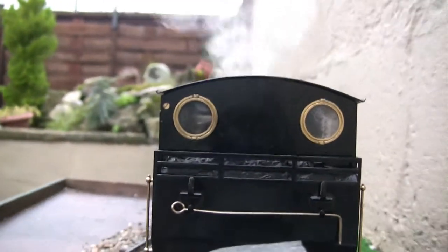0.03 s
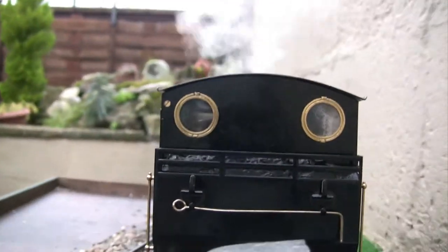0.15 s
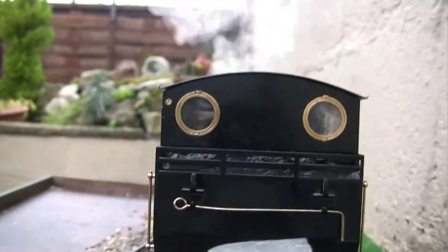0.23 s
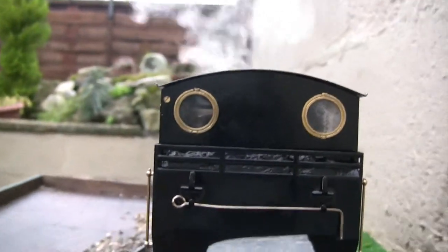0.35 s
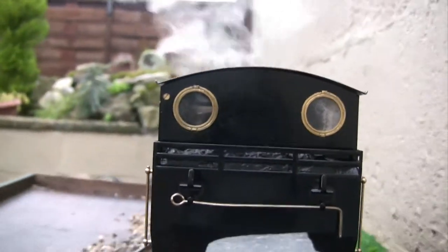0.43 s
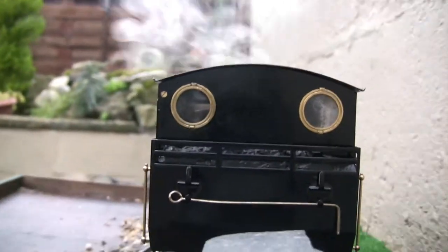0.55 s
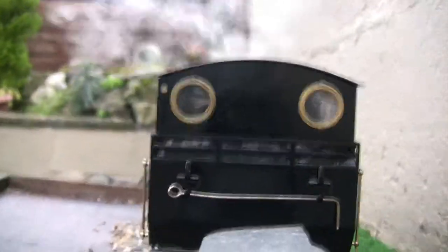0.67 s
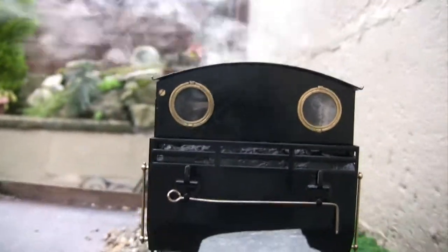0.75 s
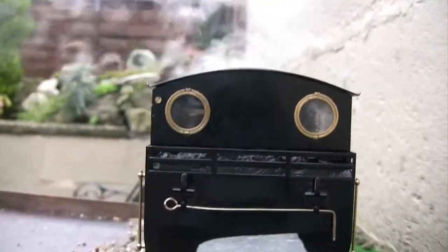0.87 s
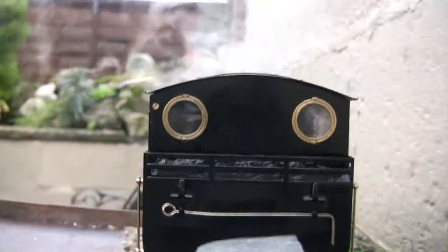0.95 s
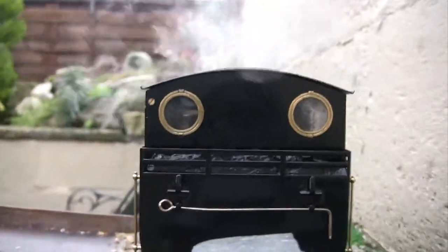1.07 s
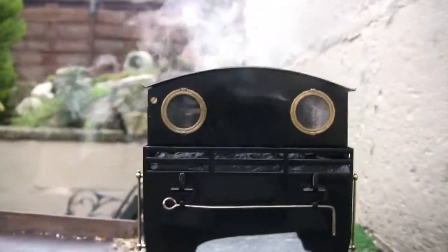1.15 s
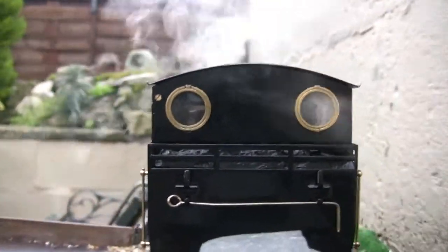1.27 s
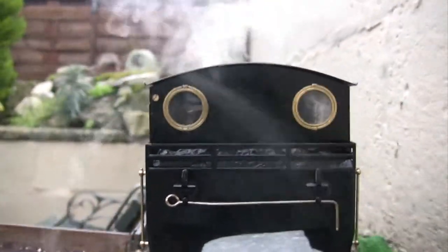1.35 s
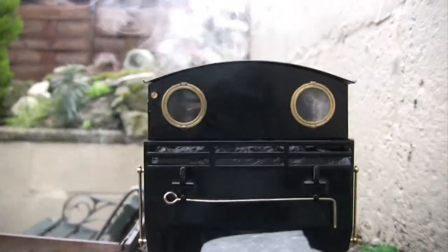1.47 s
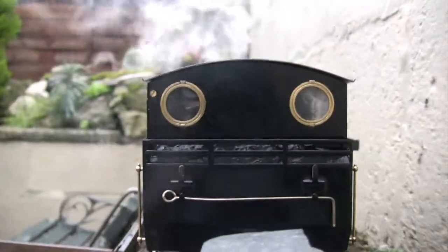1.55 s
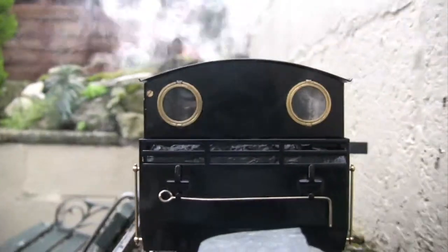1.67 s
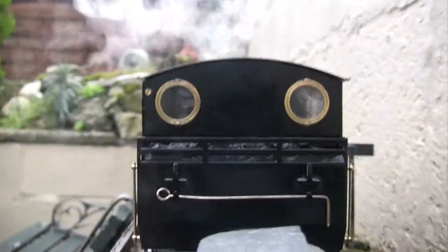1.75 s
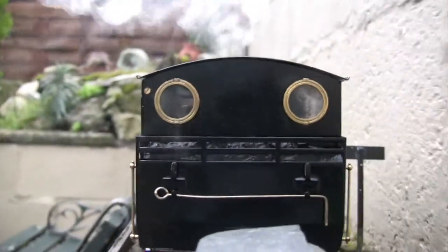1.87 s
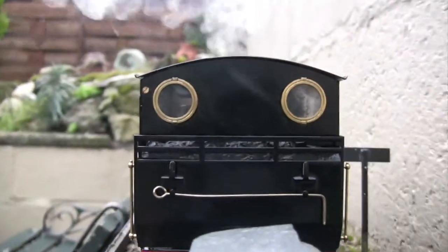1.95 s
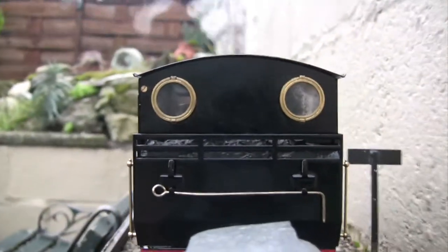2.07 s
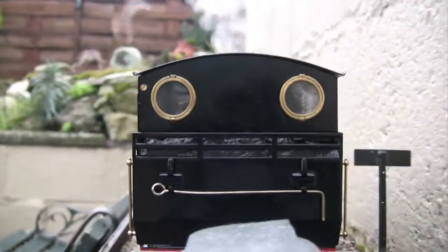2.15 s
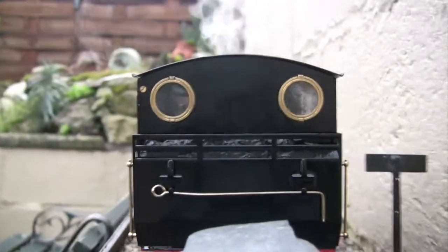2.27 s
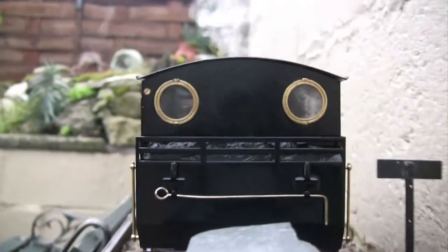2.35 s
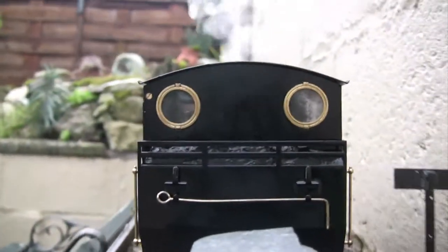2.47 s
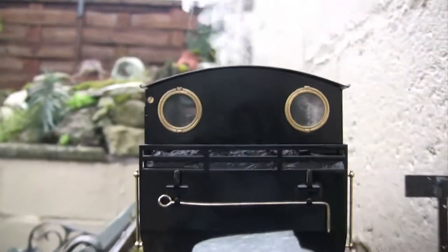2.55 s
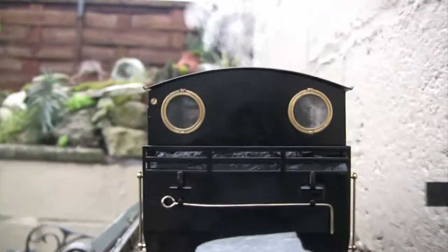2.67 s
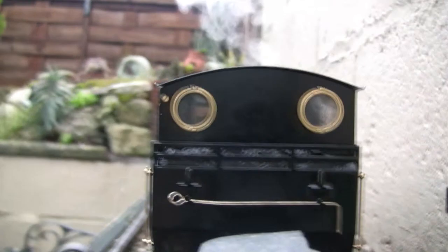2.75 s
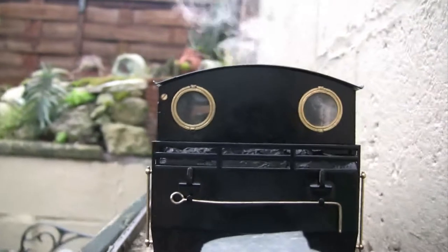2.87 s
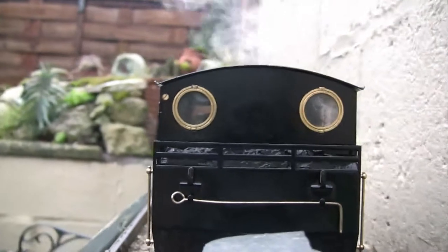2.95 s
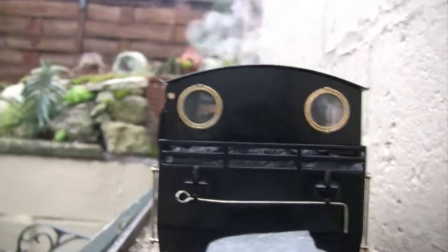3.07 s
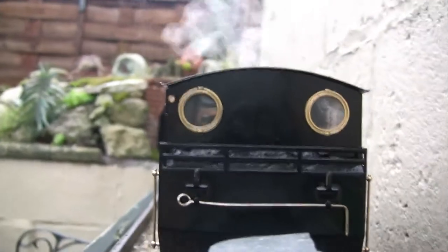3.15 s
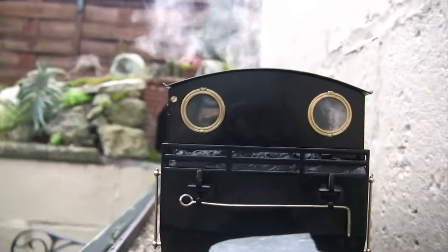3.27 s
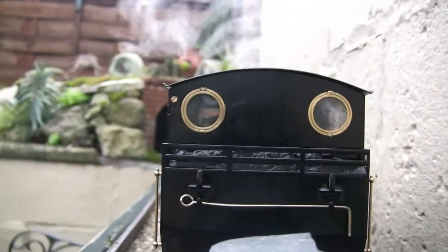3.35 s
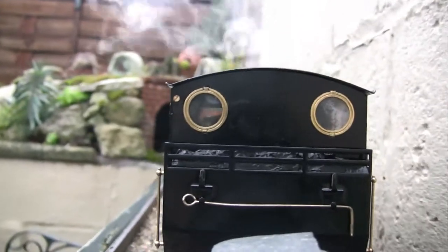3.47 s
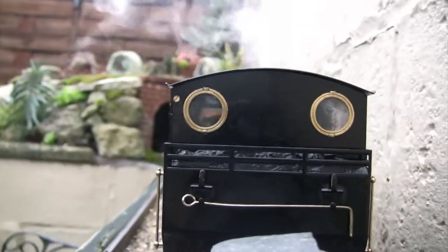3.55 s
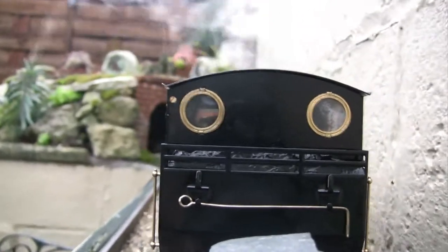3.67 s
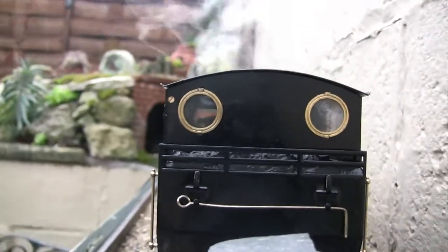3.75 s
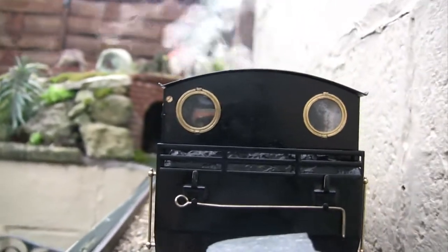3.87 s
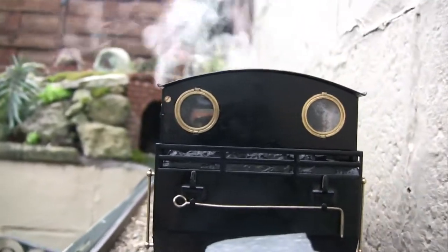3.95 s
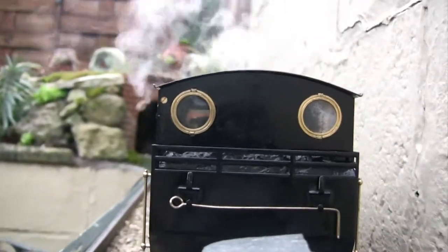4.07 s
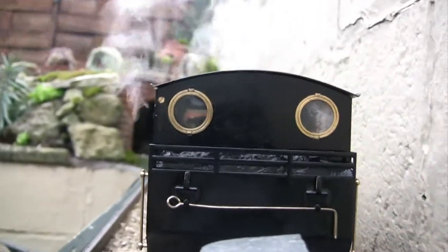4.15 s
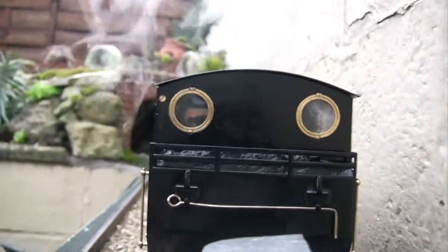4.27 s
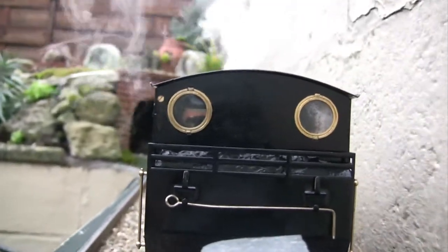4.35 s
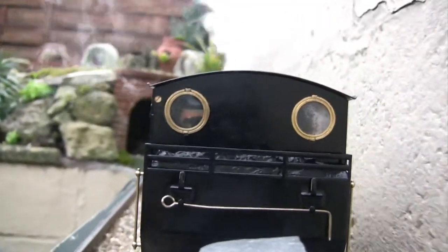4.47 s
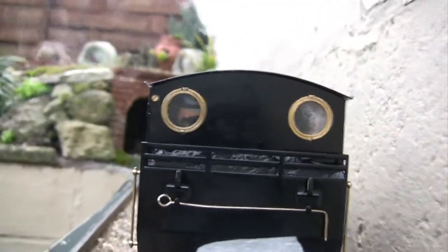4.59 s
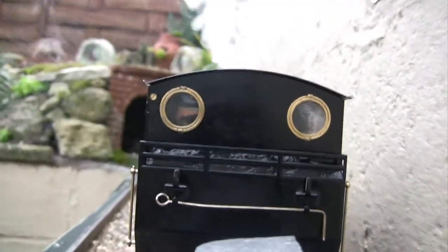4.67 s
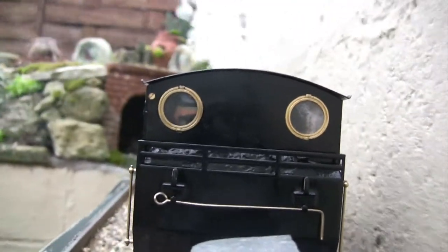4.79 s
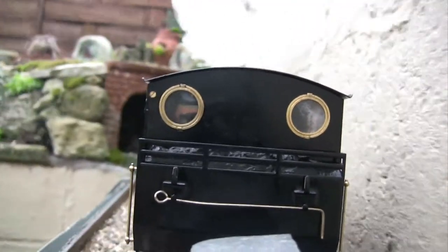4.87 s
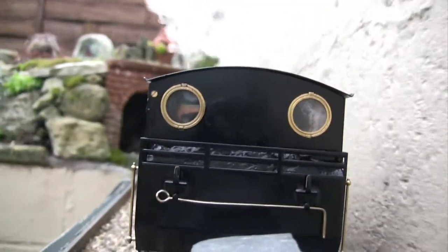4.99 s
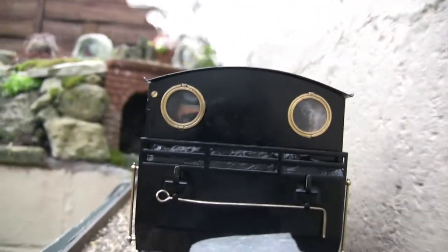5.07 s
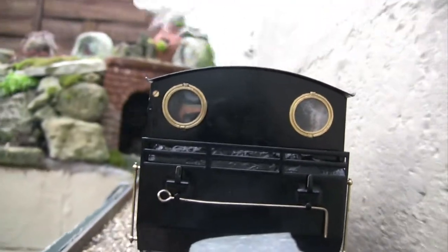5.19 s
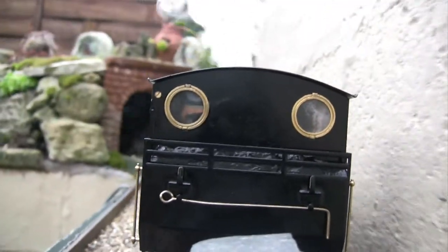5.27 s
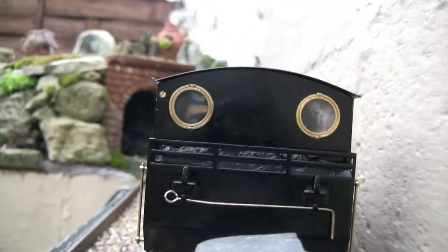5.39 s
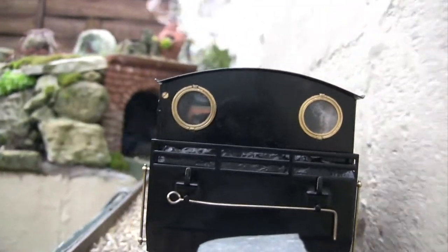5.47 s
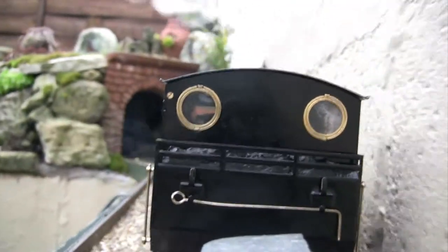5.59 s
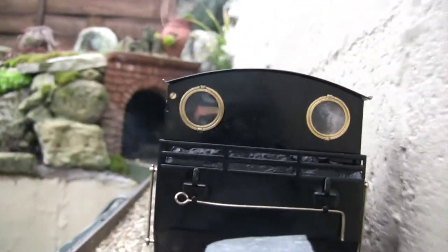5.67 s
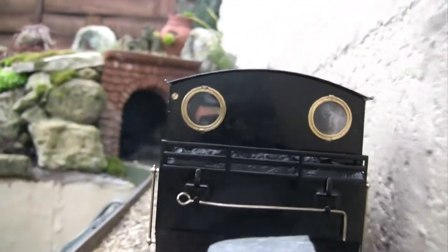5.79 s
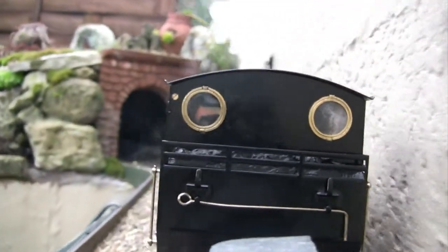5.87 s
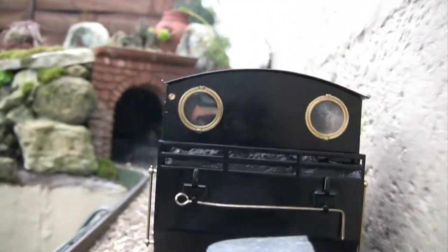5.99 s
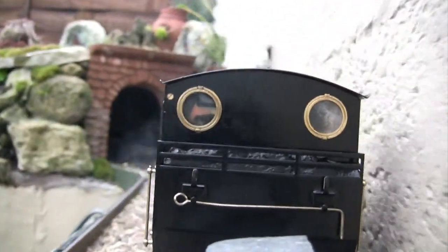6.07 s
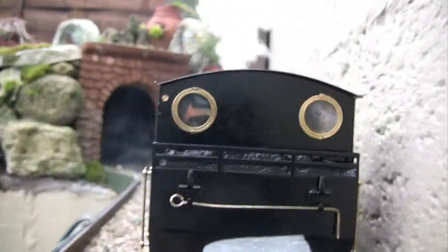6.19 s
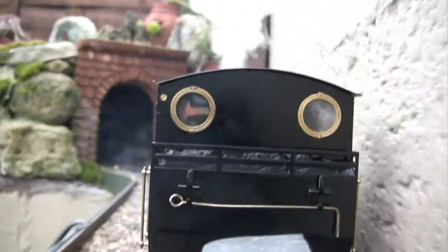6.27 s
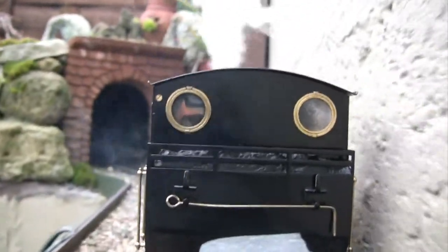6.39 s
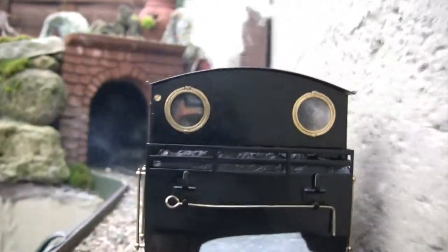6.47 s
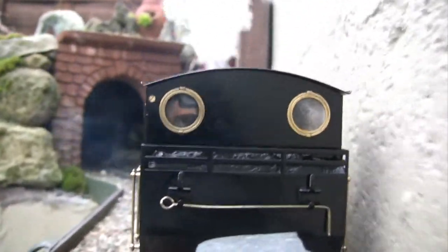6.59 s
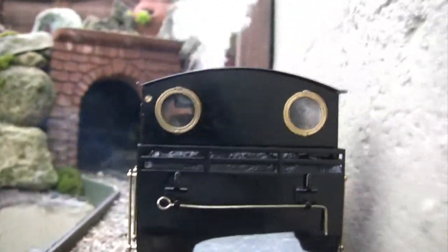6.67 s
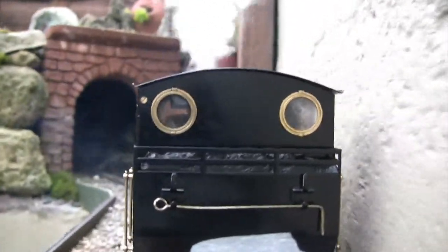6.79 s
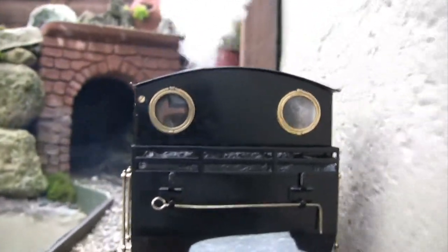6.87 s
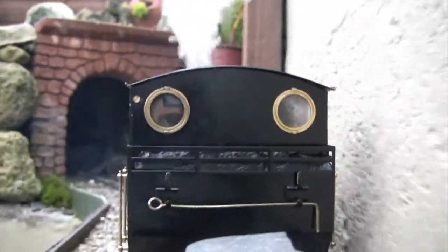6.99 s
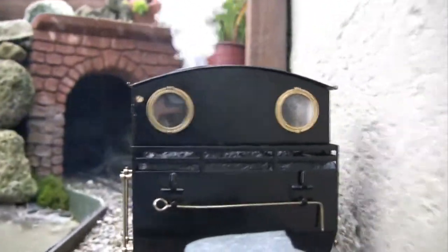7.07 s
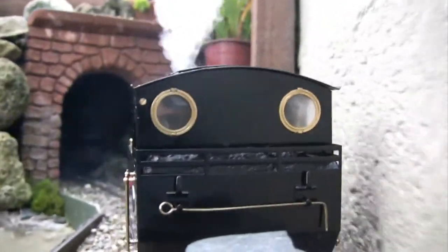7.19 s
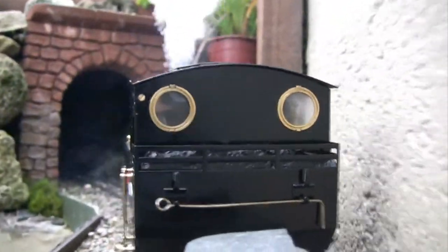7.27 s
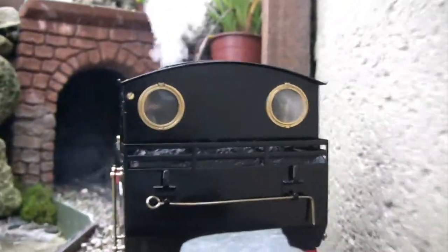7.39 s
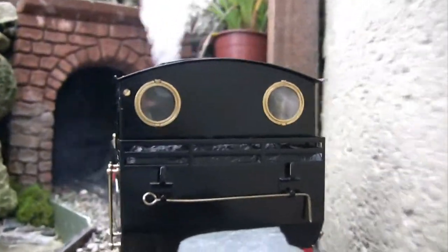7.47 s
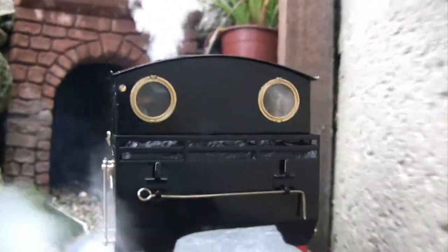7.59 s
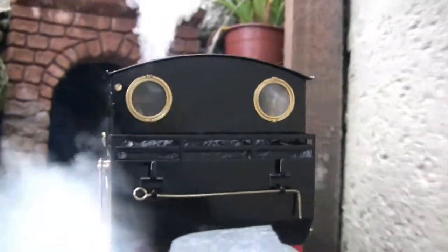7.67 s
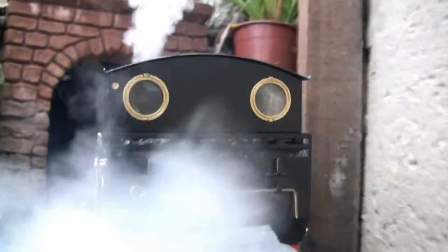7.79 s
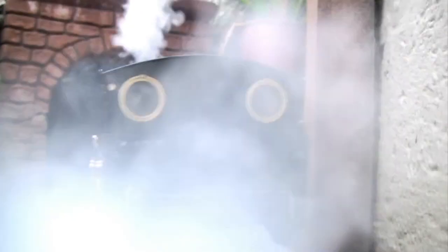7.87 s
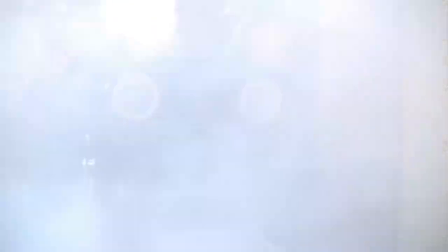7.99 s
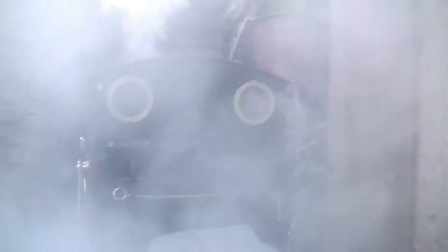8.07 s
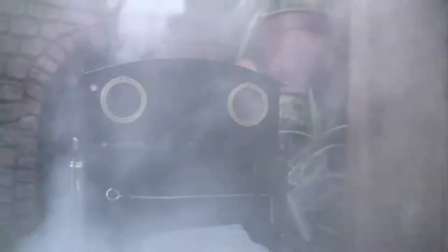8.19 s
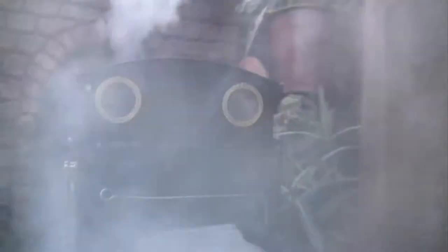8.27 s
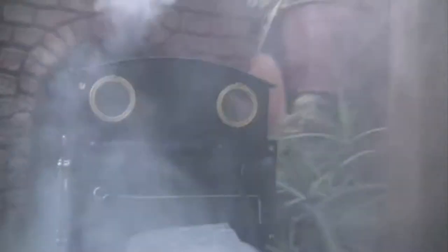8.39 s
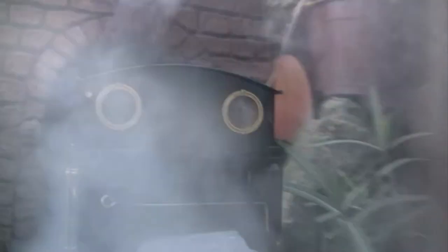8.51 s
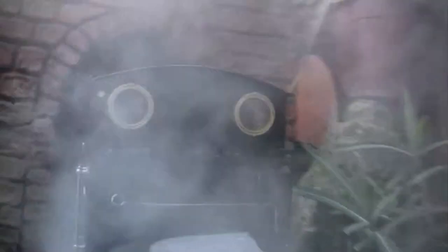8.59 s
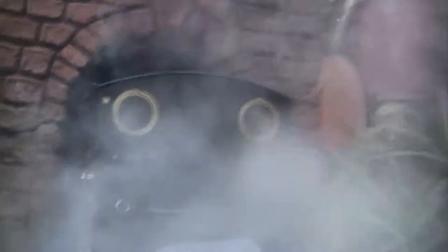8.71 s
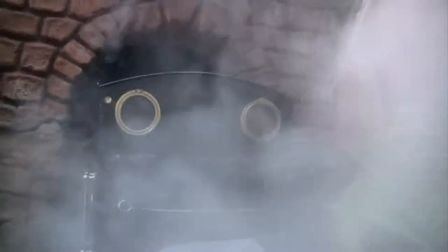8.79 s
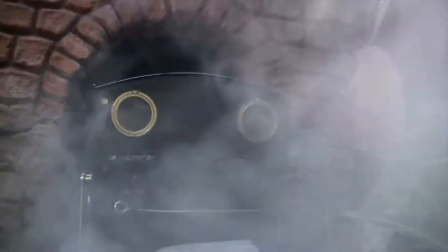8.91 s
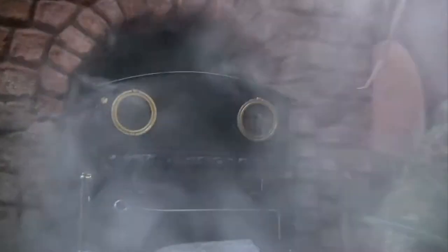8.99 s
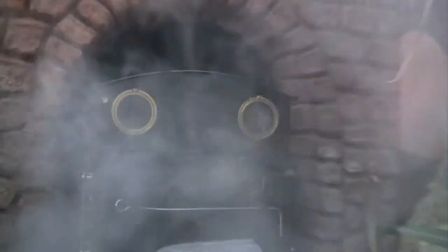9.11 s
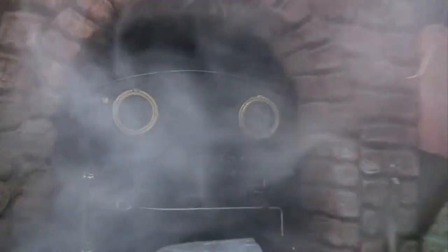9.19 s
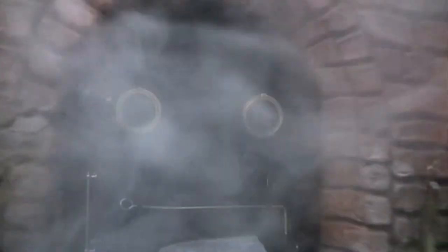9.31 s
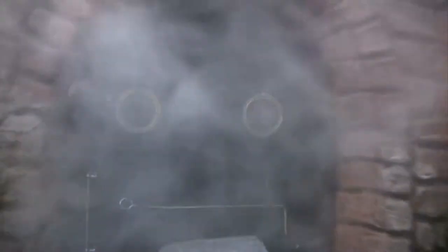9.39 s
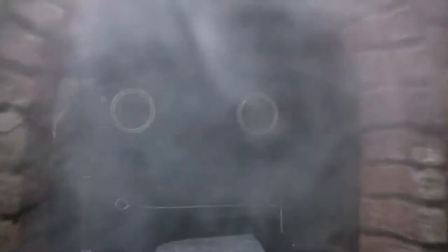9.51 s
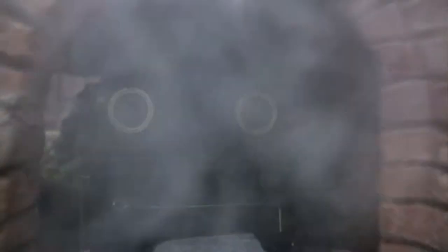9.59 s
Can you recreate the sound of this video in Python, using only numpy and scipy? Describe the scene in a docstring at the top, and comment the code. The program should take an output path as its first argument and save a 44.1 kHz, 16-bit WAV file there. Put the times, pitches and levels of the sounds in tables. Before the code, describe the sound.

A small live-steam engine chuffs and hisses along a garden track, then its shrill whistle blasts, distorting, before racing chuffs echo in a brick tunnel.

```python
"""Garden railway: a small live-steam locomotive, heard from just behind as it nears a tunnel.
Shaped noise gives the rolling rumble, the hiss and the chuffs, which slow on a curve and then pick up;
resonators and noise bursts give the rail joints and clinks. Near the tunnel the beats race in a cloud
of steam, a whistle of sine partials and jet noise overloads both microphones, and delayed copies
form the echoes of the wall and the brickwork."""
import sys
import numpy as np
from scipy import signal
from scipy.fft import rfft, irfft, next_fast_len
from scipy.io import wavfile

SR = 44100
rng = np.random.default_rng(int(sys.argv[2]) if len(sys.argv) > 2 else 0)


def dump(signal):
    """Clip the signal to [-1, 1] and save it as 16-bit WAV at the path in sys.argv[1]."""
    limited = np.clip(np.atleast_2d(signal).T, -1, 1)
    pcm = np.round(limited * 32767).astype(np.int16)
    wavfile.write(sys.argv[1], SR, pcm)


N = 425565
TIME = np.arange(N) / SR
CUTOFF_HZ = 15700

# Levels are those of each source before echoes and the microphone limit.
# regulator: t/s, port opening time constant/s, beat tail/s, share of full exhaust (0-1), share of wet steam (0-1)
REGULATOR = [(0, 0.001, 0.029, 0.18, 0.01), (2.3, 0.001, 0.021, 0, 0), (3.0, 0.002, 0.015, 0.47, 0),
             (4.2, 0.0037, 0.036, 0.94, 0.01), (5.0, 0.0029, 0.03, 1, 0.02),
             (7.15, 0.0035, 0.025, 0.98, 0.08), (7.45, 0.0056, 0.058, 0.35, 0.26),
             (8.75, 0.0023, 0.023, 0.8, 0.97), (9.65, 0.0022, 0.024, 1, 1)]
# driving wheels, racing as they slip near the tunnel: t/s, exhaust beats/(1/s)
SPEED = [(0.0, 13.23), (1.044, 13.45), (1.789, 11.94), (2.237, 10.19), (3.325, 7.75), (3.982, 7.73),
         (4.54, 13.25), (4.849, 15.08), (5.427, 14.05), (5.849, 16.4), (6.357, 16.32), (6.641, 17.66),
         (7.198, 16.46), (7.27, 23.14), (9.048, 31.61), (9.093, 28.82), (9.65, 31.47)]
# uneven valve setting, two cylinders giving four beats a turn: lateness of each beat/beats
VALVE_LATE = [.158, .072, .113, .153]
# strength of each of the four beats: level/dB
VALVE_DB = [0.3, 0.13, -0.3, -0.5]
# steam pressure behind the beats: t/s, level/dB
EFFORT = [(0, -30.5), (.8, -27), (1.8, -26.5), (2.35, -28), (2.75, -25.8), (3.05, -21), (3.3, -25.5),
          (3.72, -24.5), (4.1, -19.5), (4.6, -19), (4.8, -16.5), (7.1, -17), (7.45, -18.5), (8.9, -15),
          (9.05, -17.5), (9.65, -16)]
# hiss from the boiler: t/s, level/dB
HISS = [(0, -37.5), (1.3, -39.5), (2.5, -38), (3.7, -38.5), (4.2, -35.5), (5, -31), (9.65, -40)]
# steam escaping from the cylinders: t/s, level/dB
LEAK = [(0, -50), (7.15, -61), (7.3, -50), (7.45, -23.5), (7.6, -25), (8.7, -25), (9.0, -27), (9.65, -28.5)]
# rolling: t/s, deep rumble level/dB, wagon body level/dB, wheel and rail level/dB
ROLLING = [(0, -40.5, -37.5, -31), (.6, -44.5, -38.5, -30.5), (2.2, -47, -40, -30),
           (2.8, -48.5, -41.5, -30.5), (3.6, -54.5, -44.5, -30.5), (4.5, -51.5, -39.5, -29.5),
           (6.3, -47, -36, -27), (7.3, -49, -35, -26), (8.75, -55, -44, -34), (9.65, -58, -43, -32.5)]
# wheels over rail joints: t/s, peak level/dB, knock f/Hz
JOINTS = [(.775, -20, 89), (1.048, -29, 80), (1.476, -11.5, 640), (1.606, -22.5, 90), (1.831, -10.5, 710),
          (1.846, -12.5, 420), (2.29, -20, 130), (2.46, -20, 570), (4.742, -19, 168), (5.647, -8, 374),
          (5.91, -15.5, 169), (6.26, -17.5, 182), (6.941, -19, 230), (7.04, -15.5, 174), (7.297, 1, 750),
          (7.338, -17, 218), (9.378, -7.5, 600), (9.398, -9.5, 567)]
# clinks of the couplings, before a common trim: t/s, relative level/dB
CLINKS = [(0.194, -27), (.772, -26), (1.04, -23), (2.298, -26), (4.728, -27), (6.491, -17.5)]
# whistle pitch once settled: t/s, f/Hz
WHISTLE_PITCH = [(7.62, 1642), (7.68, 1637), (7.77, 1678), (7.81, 1656), (7.89, 1675), (8.02, 1661),
                 (8.2, 1688), (8.37, 1717), (8.44, 1699), (8.51, 1711), (8.59, 1673), (8.655, 1713)]
# steam through the whistle, first sputtering, then clearing:
# t/s, jet level/dB, third partial level/dB, second partial level/dB
WHISTLE_STEAM = [(7.61, -14, -31, -31), (7.74, -3.5, 2.5, -8.5), (7.93, -4, 3.5, -4), (8.05, -2.5, 2, -5.5),
                 (8.16, -9, -7, -11), (8.24, -11, -17, -8.5), (8.3, -11, -25, -29),
                 (8.46, -12.5, -18, -29.5), (8.59, -6.5, -6, -15), (8.68, -11, -11, -25)]
# whistle tone at the microphones as the engine moves through its own echoes:
# t/s, left level/dB, right level/dB, left phase lead/rad
WHISTLE_PATH = [(7.61, 2.5, 6, 0.3), (7.69, 10.5, 12, 1.1), (7.75, 0.5, 18, 2), (7.8, 0.5, 15, -0.45),
                (7.87, 13, 15, -1), (7.92, 2.5, 20, -1.4), (8.05, 12.5, 13.5, -1.9), (8.12, 3, 10, -2.2),
                (8.18, 6, -4, -0.6), (8.28, 11.5, 12, -0.14), (8.55, 9, 7.5, -0.6), (8.68, 13, 11, -0.1)]
# echo from the house wall: t/s, delay/s, strength (0-1)
WALL = [(0, 0.00058, 0.17), (2, 0.00052, 0.17), (3, 0.00045, 0.18), (4, .0004, 0.22), (4.7, 0.00039, 0.22),
        (5.5, .00034, 0.06), (6.3, 0.00046, 0.06), (7.3, 0.0004, 0)]
# echo from the tunnel mouth: t/s, delay/s, strength (0-1)
PORTAL = [(0, .0016, 0), (7.15, .0015, 0), (7.35, .0014, .5), (7.55, .00122, .6), (8.72, .0012, .7),
          (8.95, .00108, .7), (9.3, .00093, .6), (9.65, .00085, .45)]

# Noise spectra, relative density: f/Hz, level/dB
# full exhaust up the chimney: f/Hz, level/dB
CHIMNEY = [(900, -38), (1400, 3), (1680, -8), (2050, 1.5), (2400, 1), (2750, -3.5), (3300, -10),
           (3680, -21.5), (3930, -7), (4150, -5), (4600, -15), (5300, -21), (7000, -22), (8200, -28),
           (9050, -12.5), (9380, -11), (10200, -35), (11200, -32), (15400, -59)]
# thin ticks of light exhaust: f/Hz, level/dB
LIGHT_EXHAUST = [(900, -3), (1650, 0), (2300, 1.5), (2650, 3.5), (2850, -14), (3350, -4), (3700, -7.5),
                 (3920, 6.5), (4130, 4), (4450, -6.5), (5200, -13), (8200, -19.5), (9000, -15.5),
                 (9330, -4.5), (9800, -16.5), (11200, -23), (15400, -51)]
# bright wet steam: f/Hz, level/dB
WET_STEAM = [(710, -22), (1200, -17), (1440, 4.5), (1620, -0.5), (1900, 0.5), (2590, 1), (3140, -8),
             (4190, 0.5), (5140, -11), (5900, -14), (8670, -0.5), (9970, -5.5), (10700, -15.5),
             (14300, -31), (15400, -29)]
# boiler hiss: f/Hz, level/dB
BOILER_HISS = [(900, 2), (1500, 10.5), (1700, -10.5), (2350, 7), (2900, -15), (3500, -14), (4030, -4),
               (4600, -13), (5600, -16), (8000, -27), (9300, -22), (11500, -31), (15000, -44)]
# deep rumble of the track: f/Hz, level/dB
RUMBLE = [(20, -28), (35, -20), (60, -3), (95, 0), (125, -3.5), (200, -35)]
# drumming wagon body: f/Hz, level/dB
BODY = [(70, -36), (120, -3.5), (180, -0.5), (240, -2), (330, -11), (500, -40)]
# metal wheels on the rails: f/Hz, level/dB
WHEELS = [(150, -20.5), (260, -8.5), (410, -1), (500, -3), (600, -6.5), (760, -7.5), (850, -13),
          (1000, -1.5), (1190, -8), (1430, -7.5), (1650, -29), (2200, -38)]
# roar of the whistle's steam jet: f/Hz, level/dB
JET = [(30, -10.5), (100, -4), (700, -7.5), (1500, 6), (2150, 3), (2800, -10), (3500, -5.5), (4500, 0),
       (7000, -4.5), (8500, -0.5), (11000, -6), (15500, -23)]
# bright coupling links: f/Hz, level/dB
LINKS = [(2000, -6), (4100, 7), (6000, 3), (9300, -2), (12000, -10), (15500, -19)]
# unlikeness of the two microphones: f/Hz, gain of side over mid/dB
WIDTH = [(60, -12), (160, -19), (450, -20.5), (1220, -28), (2200, -28.5), (3330, -9.5), (4300, -9),
         (7500, -7), (9000, -2), (9900, 0.5), (11500, -1), (15000, -10)]
# the same for the whistle jet: f/Hz, gain of side over mid/dB
JET_WIDTH = [(100, -30), (1500, 0.5), (4000, -2.5), (16000, 7.5)]

# instants at which the whistle valve is half open, and its time constants
WHISTLE_ON_S, WHISTLE_OFF_S = 7.606, 8.683
WHISTLE_ATTACK_S, WHISTLE_RELEASE_S = 0.0033, 0.0028
# the pitch is flat by this much at those instants, and takes this long to settle
SCOOP_HZ, SCOOP_S = 55, .012


def from_db(db):
    """Level to amplitude ratio."""
    return 10 ** (np.asarray(db) / 20)


def rms_one(x):
    """Normalisation to unit root-mean-square."""
    return x / np.sqrt(np.mean(x ** 2) + 1e-20)


def in_time(rows):
    """Linear interpolation: each column of a table at every sample."""
    s, *columns = np.transpose(rows)
    return [np.interp(TIME, s, column) for column in columns]


def gain_at(points, hz):
    """Spectral gain, interpolated in level along a logarithmic frequency axis."""
    known_hz, db = np.transpose(points)
    level_db = np.interp(np.log(hz + 1), np.log(known_hz), db, left=-90, right=-90)
    return from_db(level_db)


def drift(rate_hz):
    """Low-pass random fluctuation of unit rms, from a double pole at rate_hz."""
    step = 40  # audio samples per slow sample
    r = np.exp(-2 * np.pi * rate_hz * step / SR)
    draws = rng.standard_normal(N // step + 2002)
    slow = signal.lfilter([1], [1, -2 * r, r * r], draws)[2000:]  # drop the filter's start
    return np.interp(np.arange(N) / step, np.arange(len(slow)), rms_one(slow))


def noise(spectrum, width=WIDTH):
    """Mid-side synthesis: coloured stereo noise whose mid signal has unit rms."""
    size = next_fast_len(N)
    hz = np.arange(size // 2 + 1) * SR / size
    mid_bins, side_bins = rfft(rng.standard_normal((2, size))) * gain_at(spectrum, hz)
    mid = irfft(mid_bins, size)[:N]
    side = irfft(side_bins * gain_at(width, hz), size)[:N]
    return np.array([mid + side, mid - side]) / np.std(mid)


def resonance(x, hz, width_hz):
    """Damped resonance: a two-pole band-pass with unit peak gain."""
    r = np.exp(-np.pi * width_hz / SR)
    zeros = np.array([1, 0, -1]) * (1 - r * r) / 2
    poles = [1, -2 * r * np.cos(2 * np.pi * hz / SR), r * r]
    return signal.lfilter(zeros, poles, x + 1e-18)


def delayed(x, delay_s):
    """Propagation delay: each channel read at an earlier, varying time."""
    return np.array([np.interp(TIME - delay_s, TIME, side) for side in x])


def tunnel(x, t60_s=0.75, ring_db=-30, dull_hz=2500):
    """Reverberation: the bore ahead adds a dull, exponentially decaying tail."""
    tail = rng.standard_normal((2, SR)) * from_db(-60 * TIME[:SR] / t60_s)
    lowpass = signal.butter(2, dull_hz, fs=SR)
    tail = signal.lfilter(*lowpass, tail / np.linalg.norm(tail[0]))
    return x + from_db(ring_db) * signal.fftconvolve(x, tail, axes=1)[:, :N]


def wall(x):
    """Comb filtering: a very short echo hollows gaps that shift as its delay changes."""
    delay_s, strength = in_time(WALL)
    return (x + strength * delayed(x, delay_s)) / np.sqrt(1 + strength ** 2)


def portal(x, sway=0.061, dull_hz=5500, far_ratio=1.8, far_share=0.43):
    """Comb filtering by two sides of a brick arch: shortening echoes sweep the colour upwards."""
    delay_s, strength = in_time(PORTAL)
    dulled = signal.fftconvolve(x, signal.firwin(15, dull_hz, fs=SR)[None], "same", axes=1)
    # the wagon rocks, so neither path is quite steady
    near = delayed(dulled, delay_s * (1 + sway * drift(5.4)))
    far = delayed(x, far_ratio * delay_s * (1 + sway / 2 * drift(2.1)))
    return x + strength * (near + far_share * far)


def swirl(x, calm_db=1.15, wet_db=1.64, rate_hz=7, count=40):
    """Turbulent plume: each band of the spectrum fluctuates by itself, more so in wet steam."""
    size = next_fast_len(N)
    spectrum = rfft(x, size)
    hz = np.arange(size // 2 + 1) * SR / size
    centres_hz = np.geomspace(1400, 14000, count)
    depth_db = calm_db + wet_db * in_time(REGULATOR)[-1]
    out = np.zeros((2, N))
    for own in np.eye(count):
        # overlapping triangular bands that sum to one
        band = irfft(spectrum * np.interp(hz, centres_hz, own), size)[:, :N]
        out += band * from_db(depth_db * drift(rate_hz))
    return out


def rolling(rumble_lumps_db=3, body_lumps_db=3.0, wheel_lumps_db=1.59):
    """Roughness excitation: uneven track shakes the wagon, its body drums, and the wheels sing."""
    deep_db, drum_db, wheel_db = in_time(ROLLING)
    track = drift(17.5)  # shared by rumble and wheels
    rumble = from_db(deep_db + rumble_lumps_db * track) * noise(RUMBLE)
    body = from_db(drum_db + body_lumps_db * drift(18.4)) * noise(BODY)
    wheels = from_db(wheel_db + wheel_lumps_db * (track / 2 + drift(59))) * noise(WHEELS)
    return rumble + body + wheels


def joints(damping=0.23, rattle_s=0.011, rattle=0.032, thud_share=0.29):
    """Impact excitation: each joint gives a broad thud, a well-damped knock and a short rattle."""
    out, age = np.zeros(N), TIME[:SR // 8]
    for s, db, hz in JOINTS:
        blow = rattle * rng.standard_normal(len(age)) * np.exp(-age / rattle_s)
        blow[0] += 1  # the impact itself
        thud_band = signal.butter(2, [hz / 5, 1.83 * hz], "band", fs=SR, output="sos")
        thud = signal.sosfilt(thud_band, blow)
        knock = resonance(resonance(blow, hz, damping * hz), hz, 2 * hz)
        bump = knock + thud_share * thud
        at = round(s * SR)
        out[at:at + len(age)] += (from_db(db) * bump / np.abs(bump).max())[:N - at]
    return out


def ring_down(blows, decay_s):
    """Exponential decay: each impulse becomes a dying envelope."""
    return signal.lfilter([1], [1, -np.exp(-1 / (decay_s * SR))], blows + 1e-18)


def couplings(ring_s=0.0025, trim_db=-5):
    """Impulsive contact: small metal links snatch, heard as short bursts of bright noise."""
    blows = np.zeros(N)
    for s, db in CLINKS:
        blows[round(s * SR)] = from_db(db + trim_db)
    return ring_down(blows, ring_s) * noise(LINKS)


def valve_gear(per_s=14, tick_s=0.0018, tick_db=-39, spread_db=3):
    """Random impacts: loose rods tick with the colour of the light exhaust."""
    strength = from_db(tick_db + spread_db * np.clip(rng.standard_normal(N), -2, 2))
    ticks = (rng.random(N) < per_s / SR) * strength
    return ring_down(ticks, tick_s) * noise(LIGHT_EXHAUST)


def hiss(waver_db=2.5, spit_db=-1.0):
    """Jet noise: the boiler hisses throughout; the cylinders blow off steam near the tunnel."""
    boiler_db, = in_time(HISS)
    leak_db, = in_time(LEAK)
    boiler = from_db(boiler_db + waver_db * drift(22)) * noise(BOILER_HISS)
    leak = from_db(leak_db + spit_db * drift(26)) * noise(WET_STEAM)
    return boiler + leak


def whistle(jitter=0.001823, fourth_db=-5, shake_db=3.0):
    """Jet-driven pipe: a strong fundamental, overblown partials as it sputters, and jet roar."""
    hz, = in_time(WHISTLE_PITCH)
    left_db, right_db, lead_rad = in_time(WHISTLE_PATH)
    jet_db, third_db, even_db = in_time(WHISTLE_STEAM)
    since, until = TIME - WHISTLE_ON_S, WHISTLE_OFF_S - TIME
    opening = .5 + .5 * np.tanh(since / (2 * WHISTLE_ATTACK_S))
    closing = .5 + .5 * np.tanh(until / (2 * WHISTLE_RELEASE_S))
    # the pitch is flat while the valve is part open
    hz = hz - SCOOP_HZ * np.exp(-np.maximum(np.minimum(since, until) / SCOOP_S, -1))
    turn = 2 * np.pi * np.cumsum(hz * (1 + jitter * drift(97.3))) / SR
    phase = np.array([turn + lead_rad, turn])
    tone = from_db([left_db, right_db] + shake_db * drift(55)) * np.sin(phase)
    third = from_db(third_db + 2 * drift(25)) * np.sin(3 * turn)
    even_partials = np.cos(2 * phase) + from_db(fourth_db) * np.cos(4 * phase)
    even = from_db(even_db + 2 * drift(23)) * even_partials
    jet = from_db(jet_db) * noise(JET, width=JET_WIDTH)
    return opening * closing * (tone + third + even + jet)


def beats():
    """Crank kinematics: a beat at every quarter turn of the wheels, as (t/s, level/dB)."""
    per_s, = in_time(SPEED)
    travel = np.cumsum(per_s) / SR  # in beats
    number = np.arange(int(travel[-1]))
    late = np.resize(VALVE_LATE, len(number))
    times_s = np.interp(number + late, travel, TIME)
    return zip(times_s, np.resize(VALVE_DB, len(number)))


def exhaust(burst_s=0.0047, burst_share=0.5, uneven_db=0.96, flutter_db=0.46):
    """Pulsed jet noise: a port opens, steam bursts out, and the piston pushes the rest up the chimney."""
    opening_s, tail_s, full, wet = in_time(REGULATOR)
    effort_db, = in_time(EFFORT)
    power = np.zeros(N)
    for s, db in beats():
        span = slice(max(int((s - .02) * SR), 0), int((s + .2) * SR))
        age = TIME[span] - s
        valve = (1 + np.tanh(age / (2 * opening_s[span]))) / 2
        after = np.maximum(age - 2 * opening_s[span], 0)
        burst = burst_share * np.exp(-after / burst_s)
        push = (1 - burst_share) * np.exp(-after / tail_s[span])
        strength = from_db(db + uneven_db * rng.standard_normal())
        power[span] += (strength * valve * (burst + push)) ** 2
    # a light beat is a thin tick, a full one a throaty puff, a wet one a bright spit
    full, wet = np.clip([full, wet], 0, 1)
    dry_steam = np.sqrt(1 - full) * noise(LIGHT_EXHAUST) + np.sqrt(full) * noise(CHIMNEY)
    steam = np.sqrt(1 - wet) * dry_steam + np.sqrt(wet) * noise(WET_STEAM)
    return np.sqrt(power) * from_db(effort_db + flutter_db * drift(180)) * steam


def scene():
    """Superposition: steam and whistle with their echoes, over the running gear."""
    running_gear = rolling() + joints() + couplings() + valve_gear()
    steam = portal(wall(swirl(hiss() + exhaust())))
    return running_gear + tunnel(whistle()) + steam


def record(dry, top=.85):
    """Saturation: loud sound flattens against the microphones' limit; the treble is cut."""
    # four-fold oversampling keeps the overload from aliasing
    fine = signal.resample_poly(dry, 4, 1, axis=1) / top
    flat = top * fine / (1 + fine ** 4) ** 0.25
    out = signal.resample_poly(flat, 1, 4, axis=1)
    return signal.fftconvolve(out, signal.firwin(255, CUTOFF_HZ, fs=SR)[None], "same", axes=1)


dry = scene()
out = record(dry)
dump(out)
```